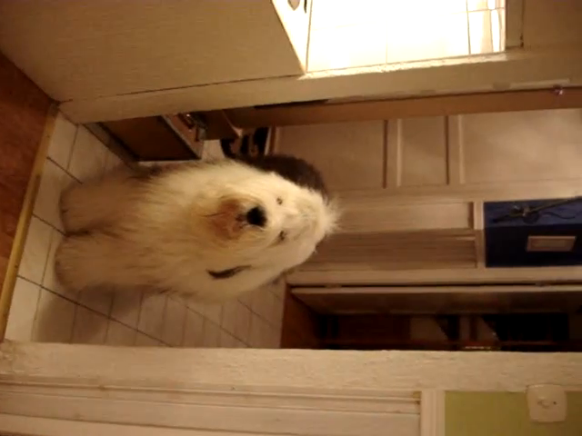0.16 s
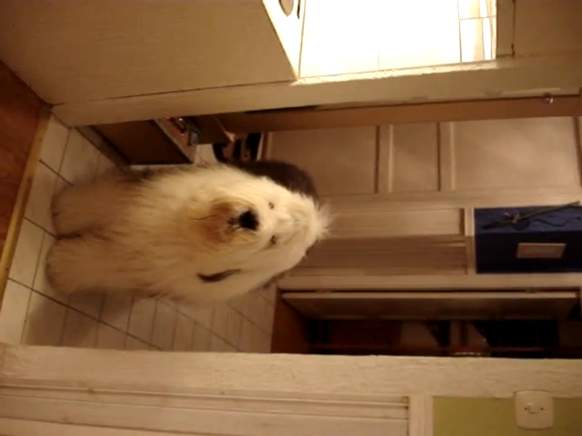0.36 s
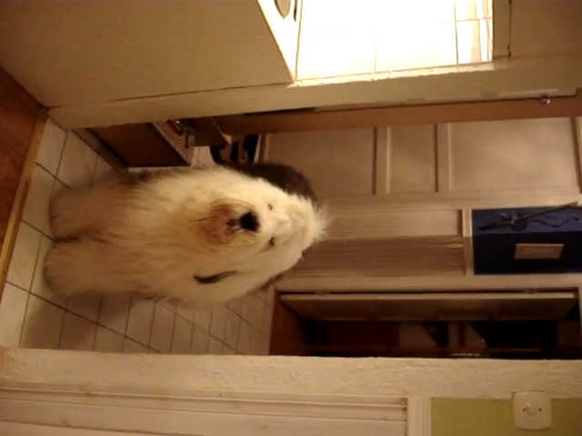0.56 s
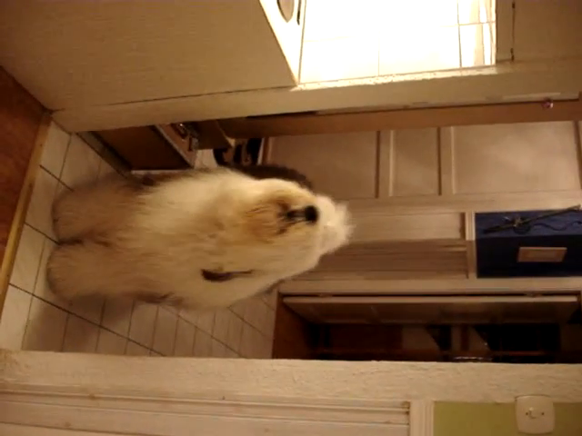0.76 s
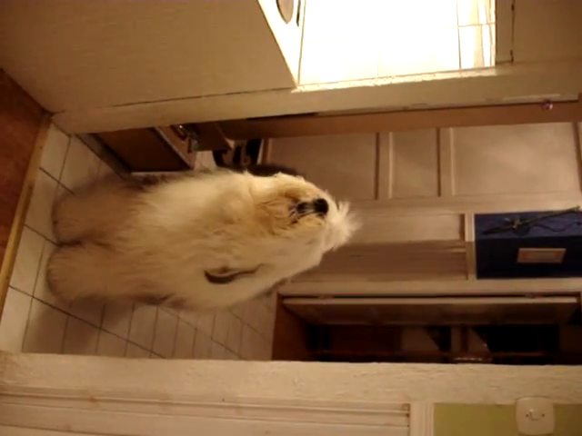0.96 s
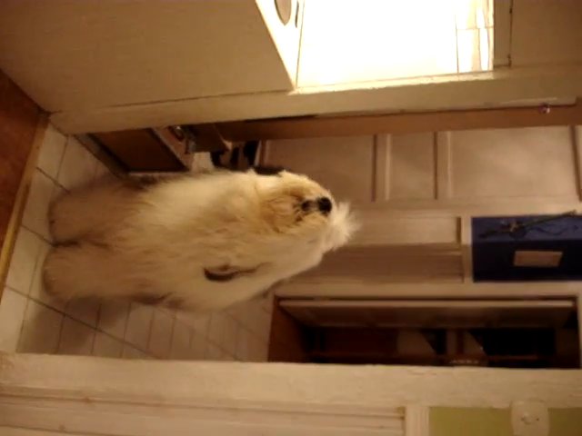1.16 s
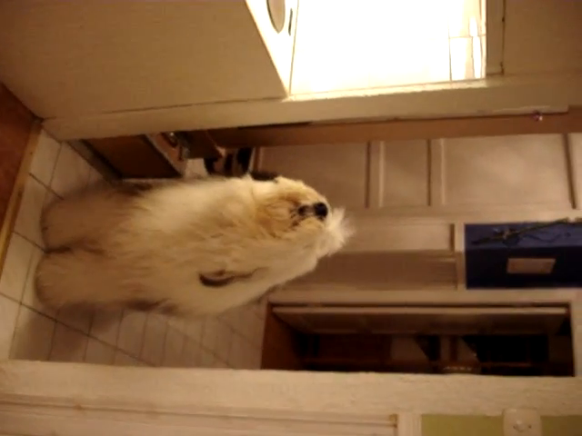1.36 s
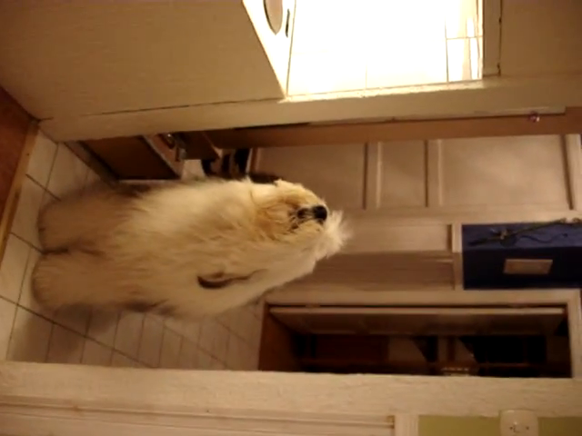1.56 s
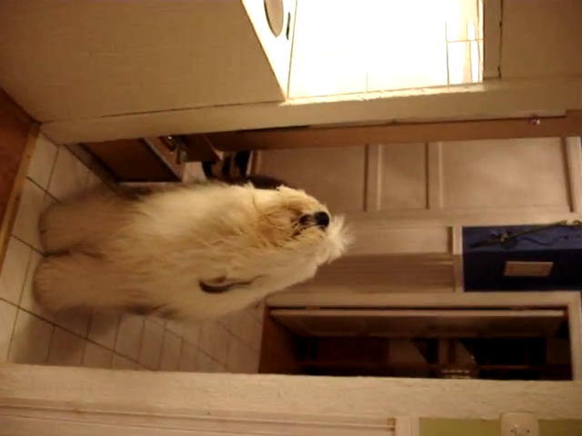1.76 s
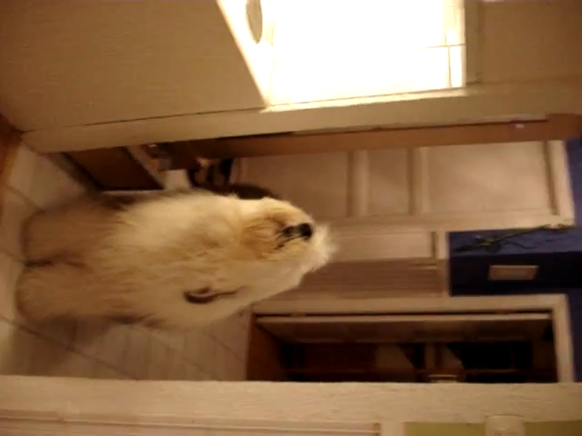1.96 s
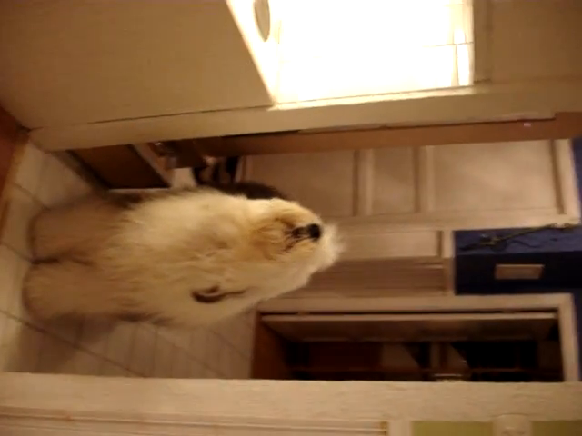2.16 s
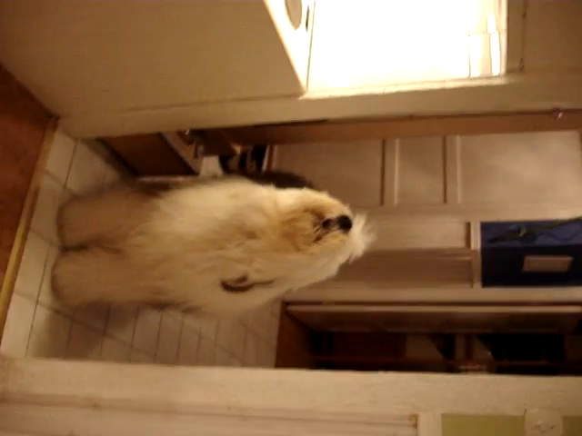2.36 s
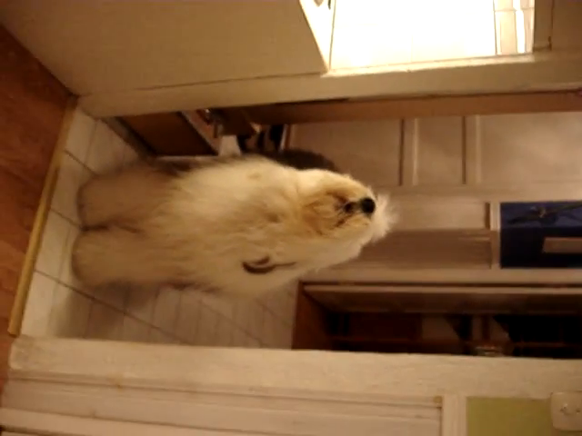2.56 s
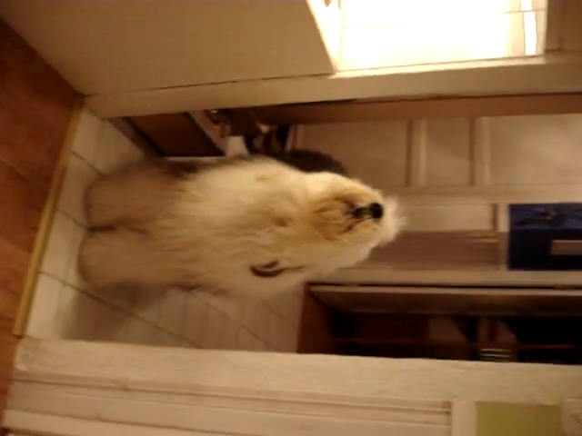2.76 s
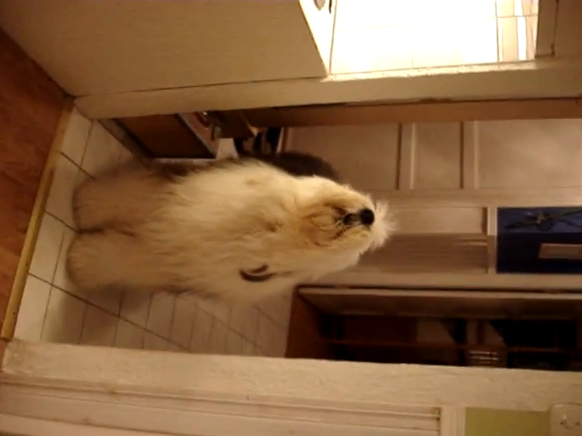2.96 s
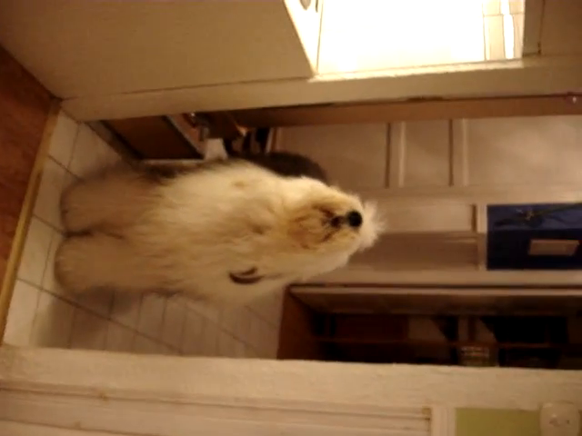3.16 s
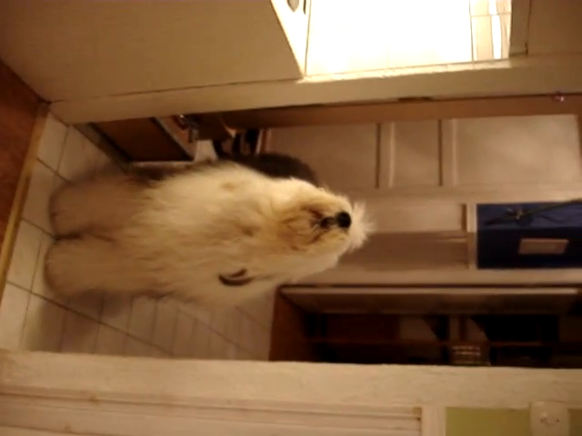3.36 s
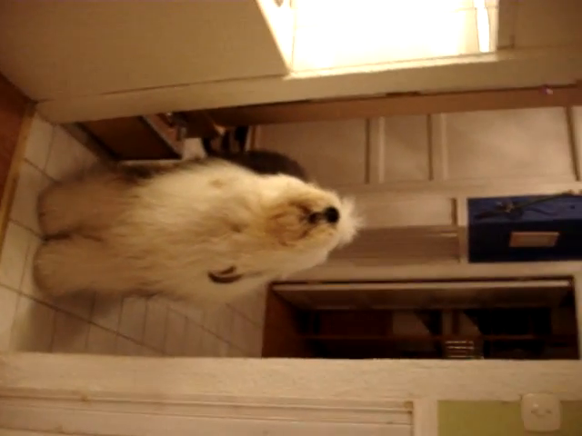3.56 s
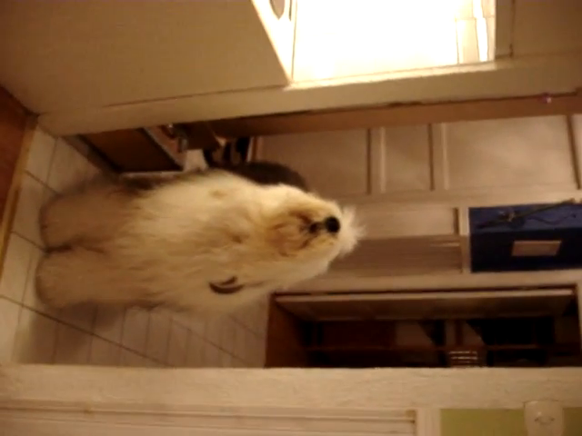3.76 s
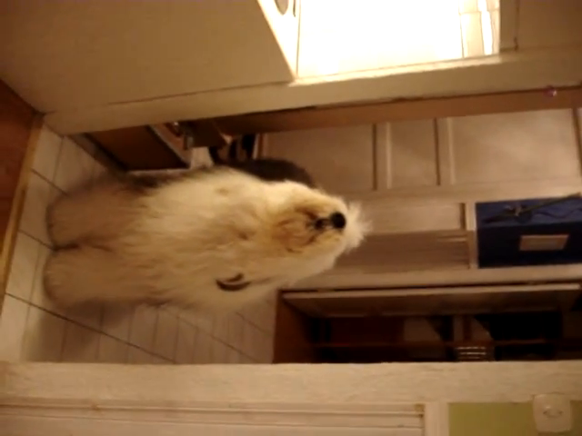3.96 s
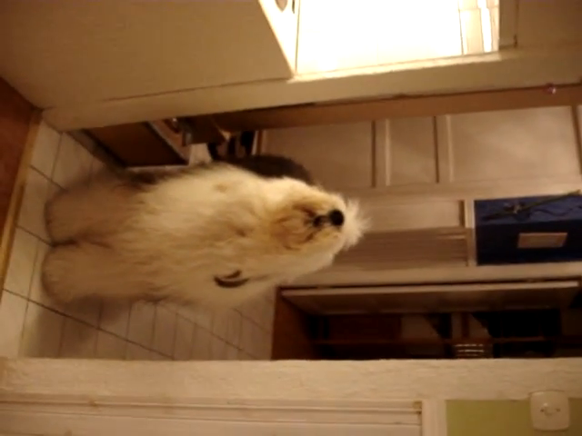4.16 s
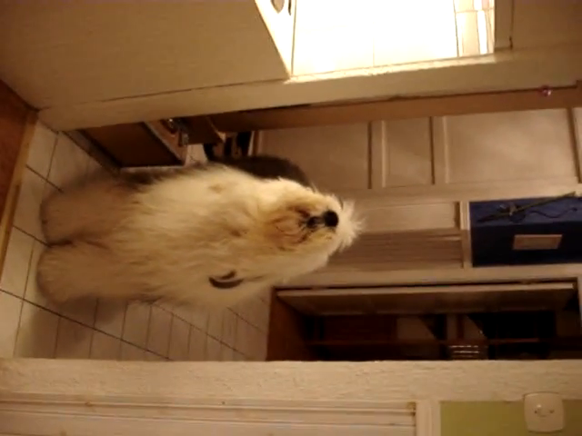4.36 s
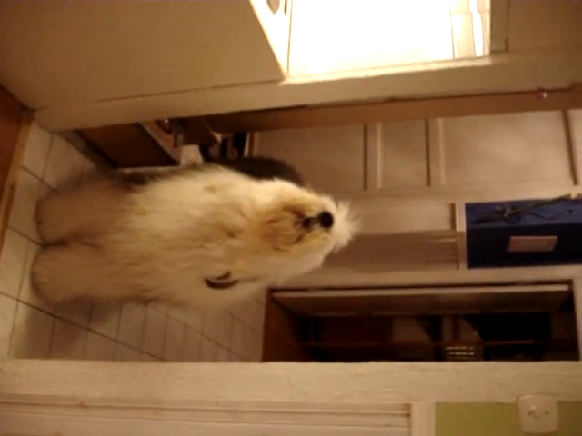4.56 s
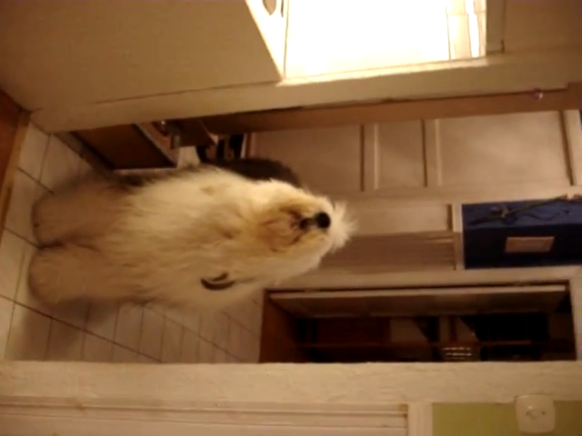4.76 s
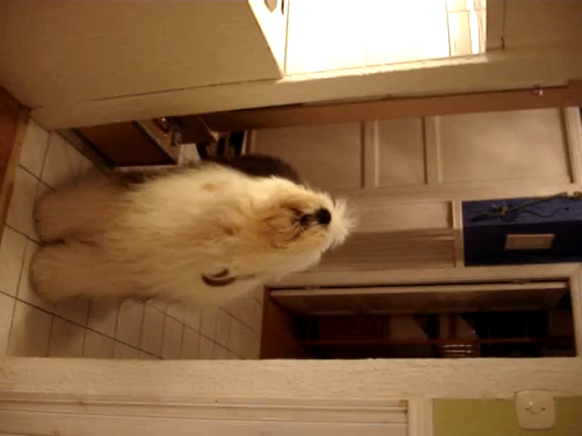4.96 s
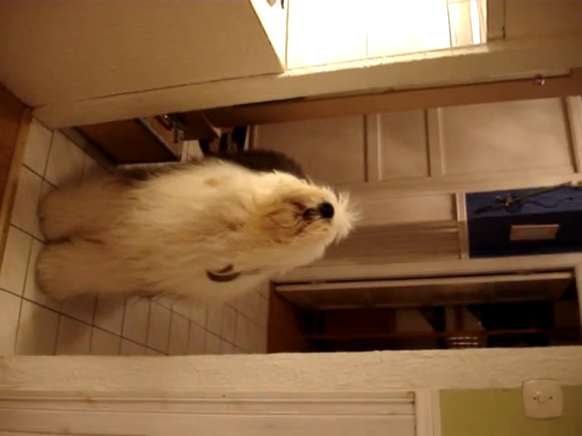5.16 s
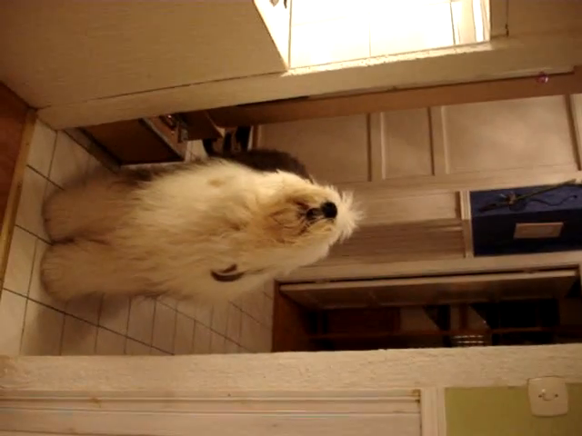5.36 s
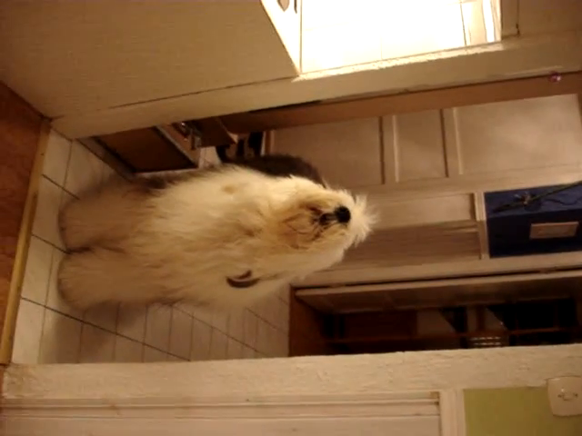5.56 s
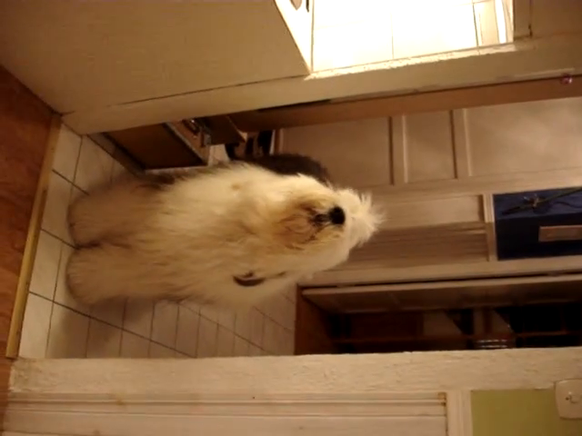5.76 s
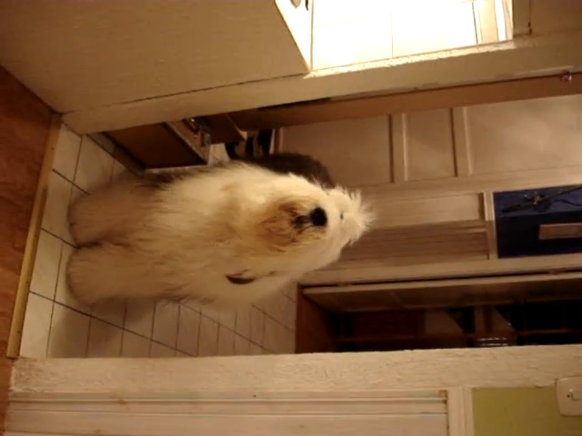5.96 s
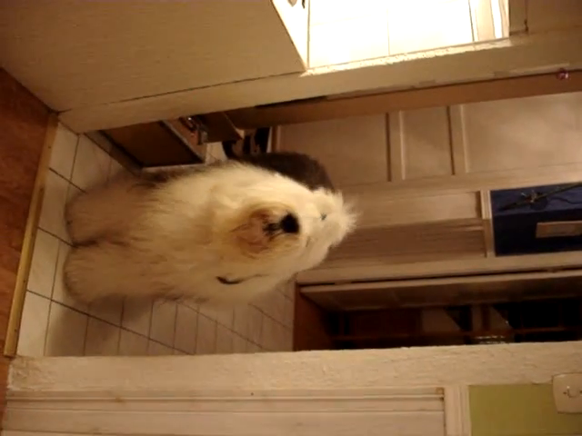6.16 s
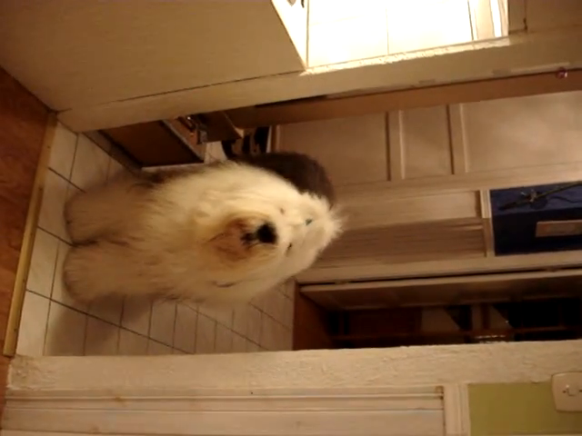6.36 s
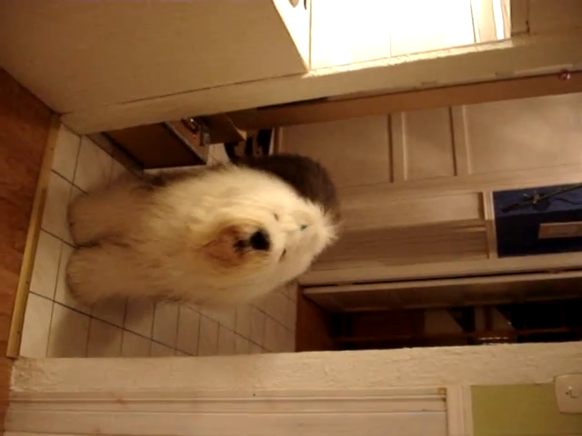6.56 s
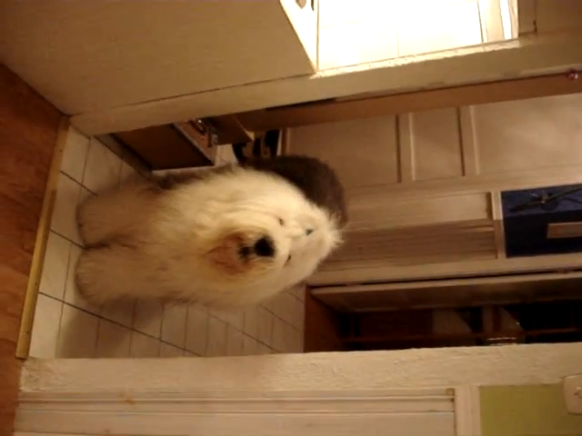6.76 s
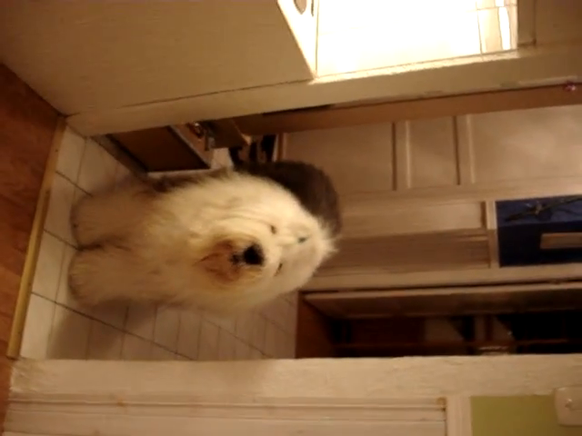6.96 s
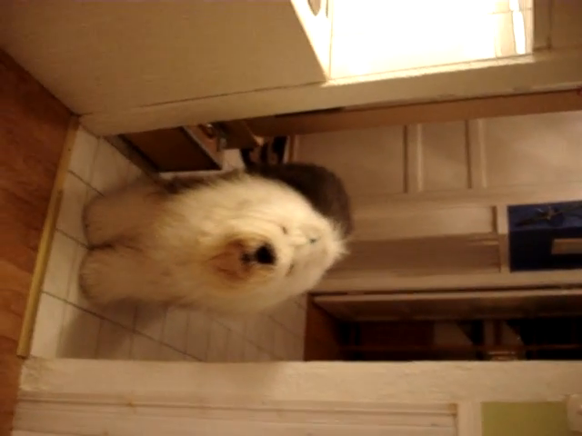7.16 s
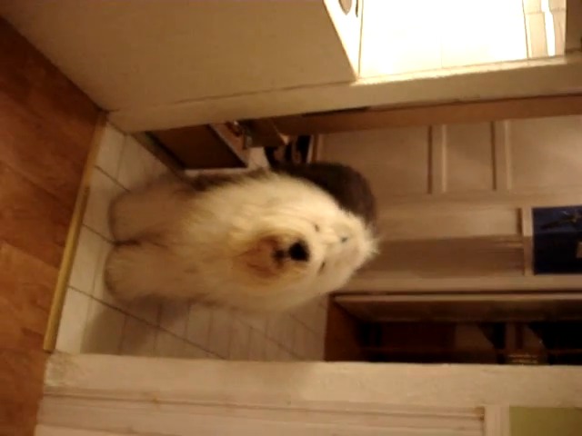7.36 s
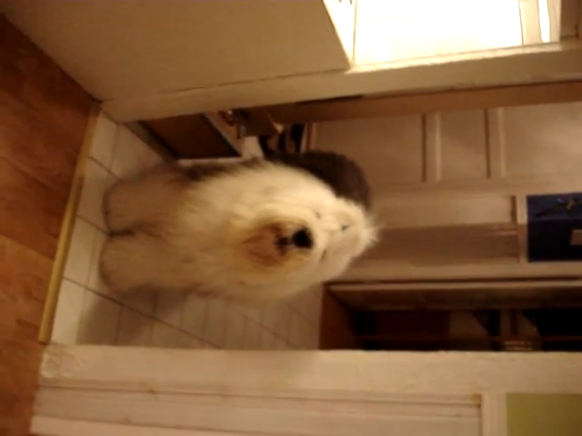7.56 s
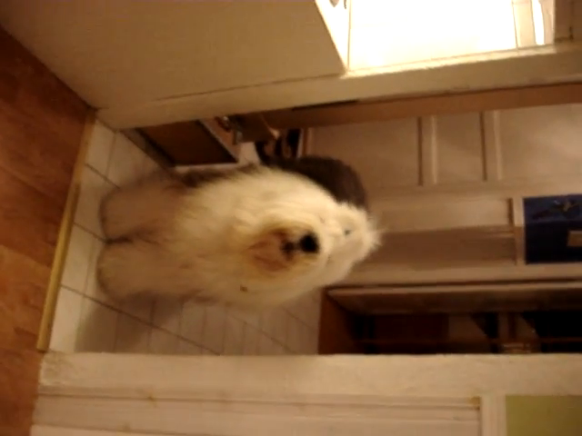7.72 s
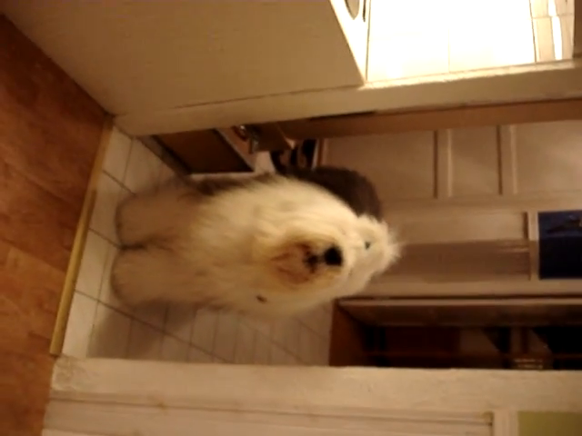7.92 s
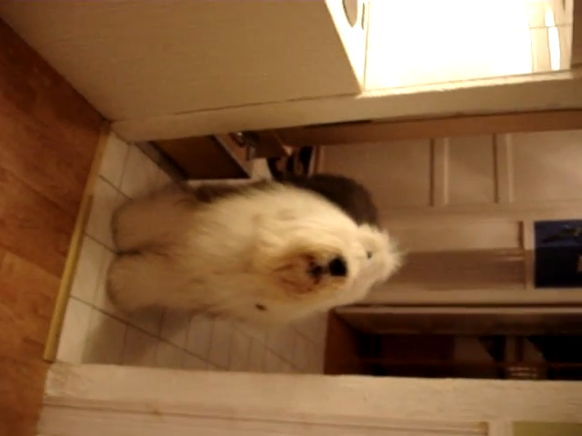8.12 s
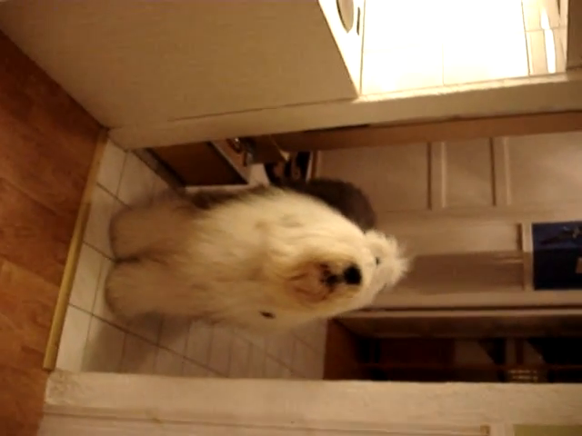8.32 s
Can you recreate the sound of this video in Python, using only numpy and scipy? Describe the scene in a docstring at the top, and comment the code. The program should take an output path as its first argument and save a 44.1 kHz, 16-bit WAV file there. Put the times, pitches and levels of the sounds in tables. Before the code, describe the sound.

Close up in a small, slightly echoing kitchen, a dog lets out a long howl that starts with a bark-like push and a rasping, split tone. It smooths into a clean held note and breaks off with a quick yelp and a low grunt. A few soft ticks fill the gap before a shorter, breathier howl wobbles up and down, levels out and cracks as it ends. Faint room noise lies underneath.

```python
"""A dog howls twice in a small tiled kitchen, close to the microphone. After a few faint ticks the first
howl breaks in harshly, its two vocal folds swinging at different pitches and beating against each other.
They lock at 3:4, then merge into one pure note, which ends in a yelp and a grunt. The head moves, and the
second howl wavers, steadies and splits again. Throughout, each low partial swells and fades as it glides
through the standing waves of the room."""
import sys
import numpy as np
from scipy import signal
from scipy.fft import rfft, irfft, next_fast_len
from scipy.io import wavfile
from scipy.ndimage import uniform_filter1d, minimum_filter1d

SR = 44100
rng = np.random.default_rng(int(sys.argv[2]) if len(sys.argv) > 2 else 0)


def log_audio(samples):
    """Write samples as a 16-bit WAV file to the path given in sys.argv[1]."""
    # one column per channel
    frames = np.atleast_2d(samples).T
    # limit to full scale, then quantise
    limited = np.clip(frames, -1, 1)
    pcm = np.round(limited * 32767).astype(np.int16)
    wavfile.write(sys.argv[1], SR, pcm)


N = 369999
TIME = np.arange(N) / SR
CUTOFF_HZ = 10000
BARK_S, HEAD_MOVES_S = 0.818, 6.2   # the harsh opening push; the head goes from thrown back to upright


def dog(rasp_db=-29, bark_db=13.5):
    """Source and filter: two folds drive the throat. Returns the low partials and the bright, rough rest."""
    # irregularity of the folds: t/s, roughness (0-1)
    roughness = [(.85, 1), (1.35, 0.52), (2.65, .3), (3.8, 0.6), (3.9, .07), (5.65, 0.1), (5.75, 0.7),
                 (6.9, 0.12), (7.25, 0.3), (7.45, 0.08), (8.27, 0.1), (8.31, 0.9)]
    rough, = in_time(roughness)
    pitch, second_pitch, locked = fold_pitches()
    lead, second = fold_phase(pitch, rough), fold_phase(second_pitch, rough)
    voiced, upper, _ = phrase_envelopes()
    split, split_gain = splitting()
    harmonics = low_harmonics(lead, pitch, upper, split)
    high = overtones(lead, pitch, rough, upper)
    combined = combination_tones(lead, pitch, second, second_pitch, rough)
    low = voiced * (harmonics + split_gain * combined)
    bark = swell(BARK_S, width_s=0.029)
    rasp = from_db(rasp_db + bark_db * bark) * beating_folds(lead, pitch, second, second_pitch, rough, locked)
    breath = husk_and_flutter(low, lead, rough, bark)
    bright = (1 - 0.8 * split) * high + split * (rasp + throat_crackle(rough))
    return low, voiced * bright + breath


def fold_pitches(lock_range=0.012):
    """Entrainment: near 3:4 the second fold is pulled into step. Returns both pitches and the lock (0-1)."""
    # pitch of the leading fold, gesture by gesture: t/s, f/Hz
    rough_arch = [(0.735, 299.1), (0.83, 343.9), (0.97, 317), (1.17, 318), (1.3, 330.7), (1.68, 341.1),
                  (2.2, 348.2), (2.58, 347), (3.0, 340), (3.62, 336.1), (3.78, 327), (4.26, 326.1)]
    held_note = [(4.52, 320.9), (4.9, 320.5), (5.06, 322.8), (5.28, 323.6), (5.42, 316.8), (5.631, 321.7),
                 (5.705, 325.7)]
    yelp_and_grunt = [(5.725, 419.5), (5.8, 401.5), (5.86, 290.9), (5.92, 245.4)]
    waver = [(6.63, 317.7), (6.714, 346.6), (6.79, 315.7), (6.87, 302.4), (6.93, 312.6), (6.966, 359.8),
             (7.14, 309.3), (7.25, 290.2)]
    dip_and_rise = [(7.32, 312.8), (7.41, 283.7), (7.49, 270.5), (7.64, 297.3), (7.82, 306.5),
                    (8.04, 308.9), (8.11, 314.8), (8.24, 316), (8.3, 327)]
    # free pitch of the second fold, sinking away from the first: t/s, f/Hz
    second_glide = [(0.735, 274), (0.92, 289), (1.28, 282), (1.55, 288), (2.2, 289), (2.68, 286),
                    (2.88, 278), (3.3, 274.5), (3.45, 269), (3.73, 268), (3.86, 245), (4.37, 242),
                    (8.29, 275), (8.39, 283)]
    pitch, = in_time(np.vstack([rough_arch, held_note, yelp_and_grunt, waver, dip_and_rise]))
    free_pitch, = in_time(second_glide)
    locked = np.clip(2 - np.abs(free_pitch / pitch - 3 / 4) / lock_range, 0, 1)
    return pitch, free_pitch + locked * (pitch * 3 / 4 - free_pitch), locked


def fold_phase(pitch, rough, jitter=0.0109, tremor=0.0012):
    """Phase is the integral of frequency, which jitters more as the voice roughens."""
    wobble = 1 + jitter * rough * drift(71.8) + tremor * drift(14)
    return 2 * np.pi * np.cumsum(pitch * wobble) / SR


def phrase_envelopes(release_s=0.024):
    """Linear attack, exponential release: the gains of the voice, its upper harmonics and the air."""
    # howl, yelp, grunt and the three parts of the second howl:
    # start/s, end/s, attack/s, level/dB, sag/(dB/s), upper harmonics/dB, air/dB
    phrases = [(0.734, 5.69, 0.042, -0.4, -0.4, -0.7, -63.5), (5.71, 5.79, 0.0096, -1, 65, -21, -72),
               (5.838, 5.895, 0.031, -6, 50, -23, -73), (6.63, 6.935, 0.022, -1.2, -1, 0, -49.5),
               (6.95, 7.22, 0.041, -1.5, 9, -4.5, -48.5), (7.305, 8.386, 0.08, -1, -2, -0.5, -55.5)]
    voice = upper = stream = 0
    for start, end, attack_s, db, sag_db_per_s, upper_db, air_db in phrases:
        age = np.maximum(TIME - start, 0)
        shape = np.minimum(age / attack_s, 1) * np.exp(-np.maximum(TIME - end, 0) / release_s)
        voice = voice + shape * from_db(db - sag_db_per_s * age)
        upper = upper + shape * from_db(upper_db)
        stream = stream + shape * from_db(air_db)
    return voice, upper, stream


def splitting(fade_s=0.045):
    """Biphonation: how far the folds are split (0-1), and the gain of the tones that this adds."""
    # the second fold swings on its own: start/s, end/s, relative level of the added tones/dB
    splits = [(0.735, 4.27, 0), (8.285, 8.39, -6)]
    gates = [np.clip(np.minimum(TIME - start, end + fade_s - TIME) / fade_s, 0, 1)
             for start, end, _ in splits]
    return sum(gates), sum(gate * from_db(db) for gate, (_, _, db) in zip(gates, splits))


def low_harmonics(phase, pitch, upper, split, waver_db=2.74, beat_db=3.5, full_glide_hz_per_s=300):
    """Harmonic series of the leading fold: five partials, which beat with their echoes as they glide."""
    glide_hz_per_s = np.abs(np.gradient(pitch)) * SR
    gliding = uniform_filter1d(np.minimum(glide_hz_per_s / full_glide_hz_per_s, 1), SR // 20)
    upper_db = 20 * np.log10(upper + 1e-6)
    note = 0
    for k in range(1, 6):
        db = standing_waves_db(k * pitch) + beat_db * gliding * drift(15)
        db -= 1.6 * k * split   # splitting costs the higher harmonics most
        db -= 3.5 * (k % 2 == 0)   # weak even harmonics make the note hollow
        db += (k > 1) * (upper_db + waver_db * drift(6.2))   # upper harmonics come in later and waver
        note = note + tone(k * phase, db)
    return note


def overtones(phase, pitch, rough, upper, back_db=-46, upright_db=-48, waver_db=2.74, hollow=0.25):
    """Forced resonance: the leading fold's pulses ring in the throat, above the fifth harmonic."""
    head_db = np.where(TIME < HEAD_MOVES_S, back_db, upright_db)
    level_db = head_db + 10 * np.log10(upper + 1e-6) + waver_db * drift(12)
    # the opening, half a cycle after the closing, weakens the even harmonics
    source = pulses(phase, pitch) - hollow * pulses(phase + np.pi, pitch) + rough * turbulence(phase)
    ringing = throat(lows(source, 1200, order=1))
    high = evened(highs(ringing, 1800, order=12), 1800, 2700)
    # while the note is clean, one high harmonic rings out as a thin whistle
    whistle = tone(20 * phase, db=-11) * np.exp(-rough / 0.12)
    return from_db(level_db) * (high + whistle)


def combination_tones(lead, pitch, second, second_pitch, rough, shimmer_db=5.0):
    """Nonlinear coupling: sum and difference tones sound beside the second fold's own partials."""
    # tones of the split folds: multiple of the leading pitch, multiple of the second
    multiples = [(0, 1), (0, 2), (1, 1), (2, -1), (3, -2), (1, 2), (1, 3)]
    # strength of each of these tones: relative level/dB
    levels = [-0.04, 1.4, 0.26, 0, -1.5, 1.5, -1.6]
    tones = 0
    for (m, n), db in zip(multiples, levels):
        room_db = standing_waves_db(m * pitch + n * second_pitch)
        tones = tones + tone(m * lead + n * second, db + room_db + shimmer_db * rough * drift(25))
    return tones


def beating_folds(lead, pitch, second, second_pitch, rough, locked, coupling=1.7, beat_depth=7.9):
    """Amplitude modulation: each fold's opening gates the other's pulses, making a rasp of sidebands."""
    leading = pulses(lead, pitch)
    free = pulses(second, second_pitch) * np.exp(coupling * np.cos(lead))
    free += 0.26 * leading * np.exp(coupling * np.cos(second))
    # in step, the leading pulses swell and shrink with the beat
    in_step = rms_one(leading * (1 + beat_depth * np.cos(lead - second)))
    in_step += 0.63 * np.sin(2 * (lead + second))   # octave of the sum tone
    source = (1 - locked) * rms_one(free) + locked * in_step
    voice = throat(source + 2.1 * rough * turbulence(lead - second))
    # colliding folds close abruptly, lighting up the highest resonances; this edge wears off with time
    edge = signal.sosfiltfilt(signal.butter(3, 2100, "high", fs=SR, output="sos"), voice)
    edge_db = 6 - 3 * (TIME - BARK_S)
    return evened(voice + from_db(edge_db) * edge, 723, 1400, window_s=0.06)


def pulses(phase, pitch):
    """Impulse train: one sharp closing per cycle gives equal harmonics up to the cutoff, at unit power."""
    terms = 2 * CUTOFF_HZ / pitch + 1
    half_phase = (phase / 2 + np.pi / 2) % np.pi - np.pi / 2
    return rms_one(terms * np.sinc(terms * half_phase / np.pi) / np.sinc(half_phase / np.pi) - 1)


def turbulence(phase, depth=0.21):
    """Modulated flow noise: it swells once per cycle."""
    return rng.standard_normal(N) * (1 + depth * np.cos(phase))


def throat(x):
    """Formant filter: steep resonances of minimum phase, so they ring after each pulse."""
    # resonances of throat and muzzle: f/Hz, half-width/Hz, level/dB
    formants = [(327, 63, -10.5), (518, 212, 9), (622, 250, 4.5), (1020, 510, -11), (1004, 135, 5.5),
                (1555, 146, -5), (1679, 110, -8), (2339, 211, -16.5), (2391, 52, -11), (3602, 220, -31),
                (4620, 370, -29.5), (5960, 340, -35.5), (6434, 45, -31.5), (7700, 270, -38)]
    size = next_fast_len(N + SR // 4)
    power = peaks_power(np.abs(np.fft.fftfreq(size, 1 / SR)), formants)
    log_gain = np.log(power + 1e-7) / 2
    response = np.exp(np.conj(signal.hilbert(log_gain)))
    ringing = np.fft.ifft(np.fft.fft(x, size) * response).real[:N]
    return highs(ringing, 275, order=4)


def husk_and_flutter(low, lead, rough, bark):
    """Turbulent flow adds a husky edge and a low flutter, both in proportion to the voice's amplitude."""
    # spectrum of the flutter: f/Hz, relative level/dB
    rumble = [(20, -4), (50, -3), (120, -3), (200, -5), (400, -26), (900, -45)]
    effort = np.sqrt(np.maximum(uniform_filter1d(low ** 2, SR // 50), 0))
    husk = from_db(-15) * rough * rms_one(throat(turbulence(lead)))
    flutter = from_db(-43 + 10 * bark) * (1 + 0.25 * rough) * noise(rumble)
    return effort * (husk + flutter)


def throat_crackle(rough, full_rate_per_s=55, gain_db=-10):
    """Shot noise: tiny wet ticks, more of them the rougher the voice."""
    fired = rng.random(N) < full_rate_per_s * rough ** 2 / SR
    snaps = fired * from_db(gain_db) * rng.uniform(0.48, 1, N)
    return band(snaps + 1e-18, 1200, 3100)


def crackles(gain_db=16, dull_hz=3400):
    """Low-passed impulses: single dull clicks during the harsh opening of the first howl."""
    # clicks during the rough opening: t/s, relative level/dB
    snaps = [(0.8, -33), (0.834, -28), (0.8944, -37), (0.918, -42), (0.9562, -37), (1.04, -38),
             (1.0994, -40), (1.2137, -40), (1.262, -40)]
    clicks = np.zeros(N)
    for s, db in snaps:
        clicks[int(s * SR)] = from_db(db + gain_db)
    return lows(clicks + 1e-18, dull_hz, order=4) * SR / (2 * dull_hz)


def air(puff_s=6.778, puff_db=-40, puff_decay_s=0.088, band_ratio=1.145):
    """Flow noise at the muzzle: hiss that rides on the howl, swells now and then, and spurts once."""
    # spectra of the steady hiss and of the brighter spurt: f/Hz, relative level/dB
    hiss_spectrum = [(1000, -8), (1900, 9.5), (2900, -0.5), (3800, -8), (4900, -4.5), (6200, -1),
                     (7200, -16.5), (10000, -17.5)]
    puff_spectrum = [(2000, -9.5), (4000, -8.5), (6500, -14), (8200, -14.5), (10000, -20.5)]
    # swells of air through the muzzle: t/s, half-width/s, level/dB, centre f/Hz
    hisses = [(1.96, 0.17, -49, 2100), (5.57, 0.13, -56.5, 4600), (5.2, 0.38, -54.5, 1900),
              (7.13, 0.096, -52, 5500), (7.19, 0.06, -51.5, 2650)]
    swells = 0
    for s, width_s, db, hz in hisses:
        hiss = rms_one(band(rng.standard_normal(N), hz / band_ratio, hz * band_ratio))
        swells = swells + from_db(db) * swell(s, width_s) * hiss
    age = np.maximum(TIME - puff_s, 0)
    puff = (age > 0) * np.exp(-age / puff_decay_s) * from_db(puff_db)
    _, _, stream = phrase_envelopes()
    return stream * noise(hiss_spectrum) + puff * noise(puff_spectrum) + swells


def ticks(gain_db=-6.0, decay_s=0.0071):
    """Transients: soft bursts of noise that decay exponentially."""
    # faint ticks before and between the howls: t/s, relative level/dB
    onsets = [(0.1302, -47), (0.3522, -44), (0.576, -48), (6.105, -51), (6.3025, -57), (6.3579, -45.5),
              (6.5739, -46.5)]
    envelope = sum(from_db(db + gain_db) * (TIME > s) * np.exp(-np.abs(TIME - s) / decay_s)
                   for s, db in onsets)
    return envelope * rms_one(band(rng.standard_normal(N), 900, 6500))


def standing_waves_db(hz, between_peaks_db=-46):
    """Standing waves between muzzle and microphone set the level of a partial gliding through them."""
    # response peaks with the head thrown back and upright: f/Hz, half-width/Hz, level/dB
    head_back = [(256, 12, -39), (286.6, 7.7, -21), (322.5, 28, -16), (412.6, 12, -25), (465.6, 7.6, -26.5),
                 (564.5, 30, -16.5), (607.6, 22.2, -15.5), (634, 18, -33.5), (971.3, 12, -26),
                 (1018.6, 21, -29), (1059, 12, -25), (1602, 44, -28.5)]
    head_upright = [(288, 17, -9.5), (316, 7.6, -13.5), (340, 32, -13), (562, 50, -25.5), (617, 18, -9.5),
                    (672, 30, -19.5), (925, 60, -34.5), (1081, 19, -21.5), (1227, 30, -31.5),
                    (1588, 61, -28)]
    grid = np.arange(CUTOFF_HZ)
    back, upright = [np.interp(hz, grid, peaks_power(grid, peaks)) for peaks in (head_back, head_upright)]
    return 10 * np.log10(np.where(TIME < HEAD_MOVES_S, back, upright) + from_db(between_peaks_db) ** 2)


def kitchen(x, first_echo_s=0.0039, t60_s=0.54):
    """Reverberation: dense reflections from tiles and cupboards die away exponentially."""
    age = TIME[:SR // 2]
    tail = rng.standard_normal(len(age)) * from_db(-60 * age / t60_s) * (age > first_echo_s)
    return signal.fftconvolve(x, tail / np.linalg.norm(tail))[:N]


def background(floor_db=-55.5, wander=0.0045):
    """Stationary noise: a faint broadband floor with two narrow spectral lines."""
    # spectrum of the room noise: f/Hz, relative level/dB
    floor_spectrum = [(20, 6.5), (60, -5), (130, -8), (220, -1), (400, -1), (800, -7.5), (1600, -9),
                      (3200, -14), (6300, -14), (10000, -15.5)]
    # a hum and a thin whine: f/Hz, rms level/dB
    lines = [(201, -68), (7750, -77.5)]
    floor = from_db(floor_db) * noise(floor_spectrum)
    return floor + sum(tone(2 * np.pi * np.cumsum(hz * (1 + wander * drift(60))) / SR, db)
                       for hz, db in lines)


def peaks_power(at_hz, peaks):
    """Power response of steep-sided resonances, each 9 dB down one half-width from its centre."""
    return sum(from_db(db) ** 2 / (1 + ((at_hz - hz) / width) ** 2) ** 3 for hz, width, db in peaks)


def evened(x, low_hz, high_hz, window_s=0.0086):
    """Automatic gain control: holds the power in one band at one."""
    power = uniform_filter1d(band(x, low_hz, high_hz) ** 2, int(window_s * SR))
    return x / np.sqrt(np.maximum(power, 1e-12))


def noise(spectrum):
    """Spectral shaping: noise of the given colour, at unit power."""
    hz, db = np.transpose(spectrum)
    size = 10 * SR
    bins = np.maximum(np.fft.rfftfreq(size, 1 / SR), 1)
    colour = from_db(np.interp(np.log(bins), np.log(hz), db))
    return rms_one(irfft(rfft(rng.standard_normal(size)) * colour)[:N])


def drift(rate_hz):
    """Low-passed noise: smooth random motion with spread one."""
    return rms_one(lows(rng.standard_normal(N + SR), rate_hz, order=2)[SR:])


def tone(phase, db):
    """A sinusoid with this rms level."""
    return np.sqrt(2) * from_db(db) * np.sin(phase)


def swell(s, width_s):
    """A Gaussian bump of height one."""
    return np.exp(-((TIME - s) / width_s) ** 2)


def band(x, low_hz, high_hz):
    """Butterworth band-pass."""
    return signal.sosfilt(signal.butter(2, [low_hz, high_hz], "band", fs=SR, output="sos"), x)


def lows(x, edge_hz, order):
    """Butterworth low-pass."""
    return signal.sosfilt(signal.butter(order, edge_hz, fs=SR, output="sos"), x)


def highs(x, edge_hz, order):
    """Butterworth high-pass."""
    return signal.sosfilt(signal.butter(order, edge_hz, "high", fs=SR, output="sos"), x)


def in_time(rows):
    """Linear interpolation in time; one curve per column."""
    s, *columns = np.transpose(rows)
    return [np.interp(TIME, s, column) for column in columns]


def from_db(db):
    """Decibels to gain."""
    return 10 ** (np.asarray(db) / 20)


def rms_one(x):
    """Scale to unit power."""
    return x / np.sqrt(np.mean(x ** 2) + 1e-20)


def scene(bright_direct_db=-1.0, low_room_db=-13, bright_room_db=-4):
    """Directivity: the raised muzzle throws the bright part of the voice at the walls."""
    low, bright = dog()
    bright = bright + air() + ticks()
    room = kitchen(from_db(low_room_db) * low + from_db(bright_room_db) * bright)
    return (low + from_db(bright_direct_db) * bright + room + crackles() + background())[None]


def record(dry, ceiling=0.53):
    """Peak limiting: a fast gain dip holds down the loudest peaks; a steep low-pass cuts the top."""
    needed = ceiling / np.maximum(np.abs(dry), ceiling)
    gain = uniform_filter1d(minimum_filter1d(needed, size=441), size=441)   # 10 ms windows
    return signal.sosfilt(signal.ellip(12, 0.2, 80, CUTOFF_HZ, fs=SR, output="sos"), dry * gain)


dry = scene()
out = record(dry)
log_audio(out)
```